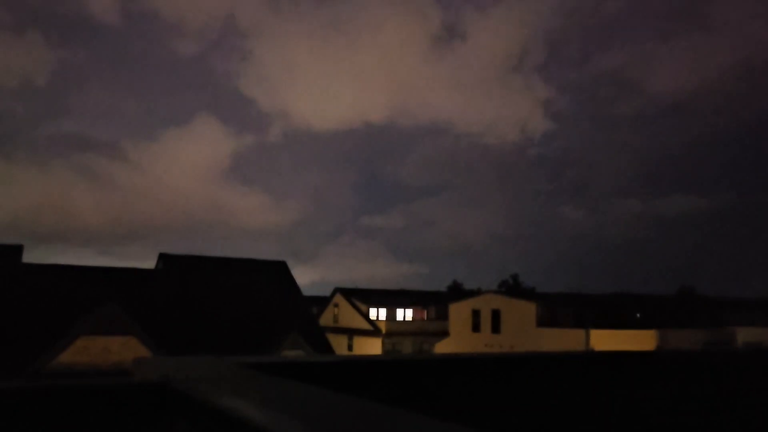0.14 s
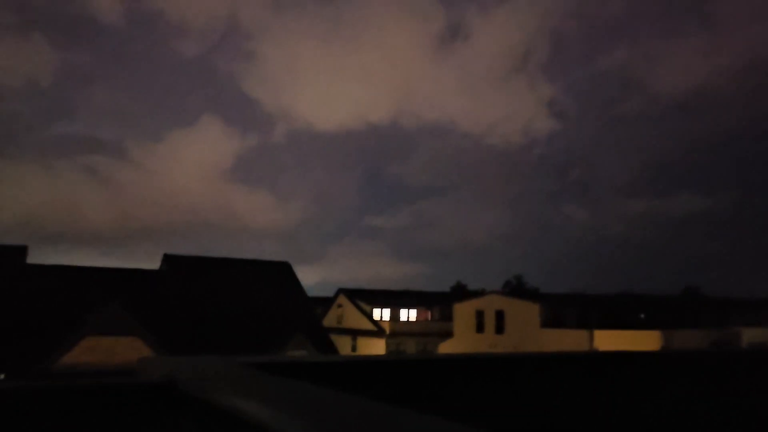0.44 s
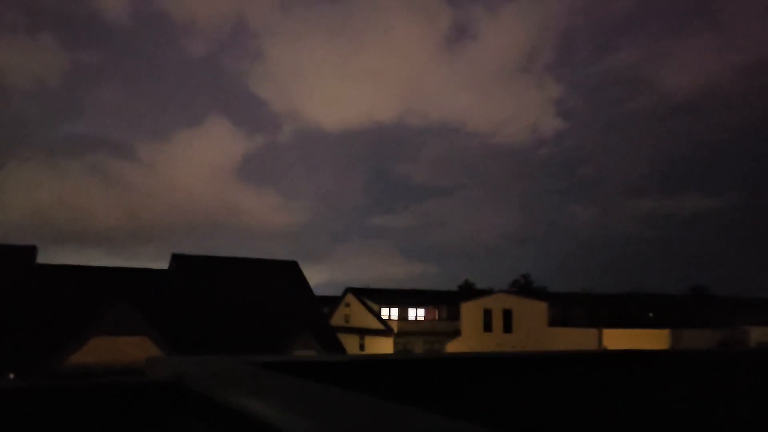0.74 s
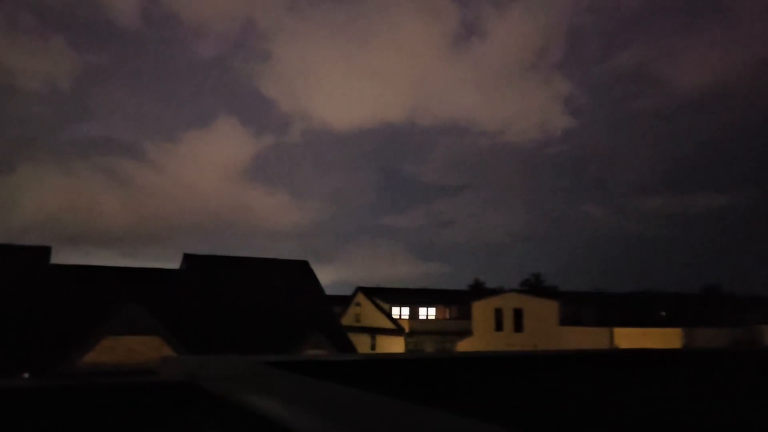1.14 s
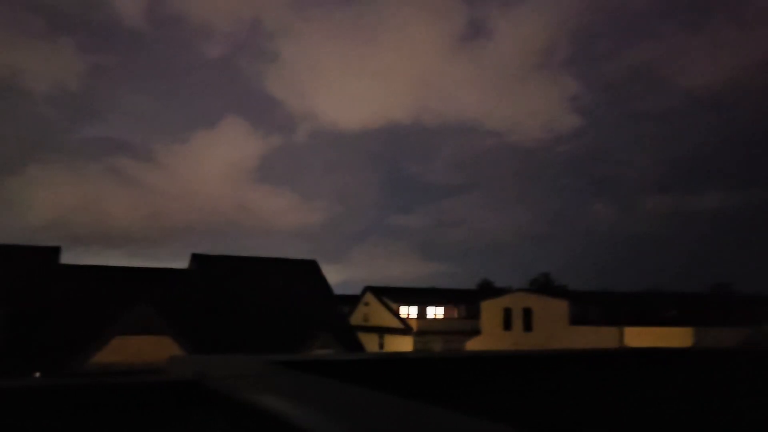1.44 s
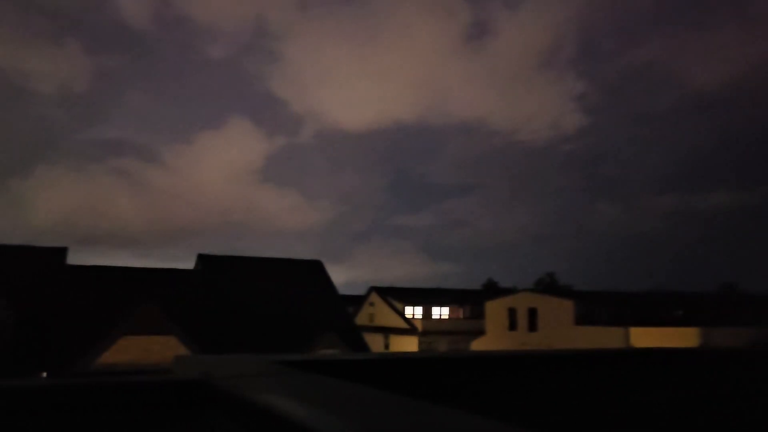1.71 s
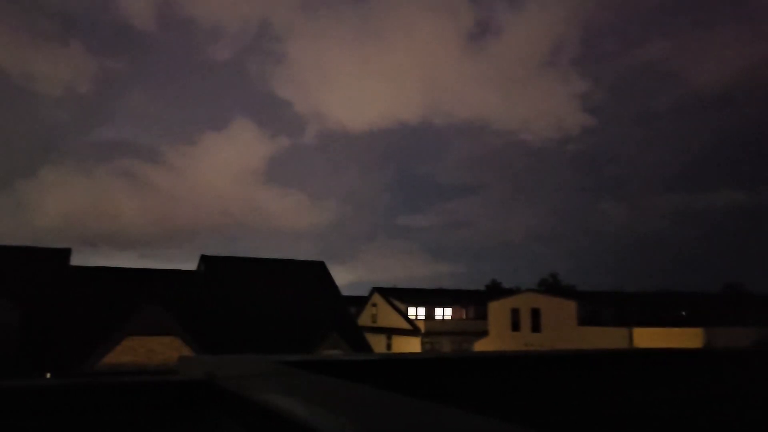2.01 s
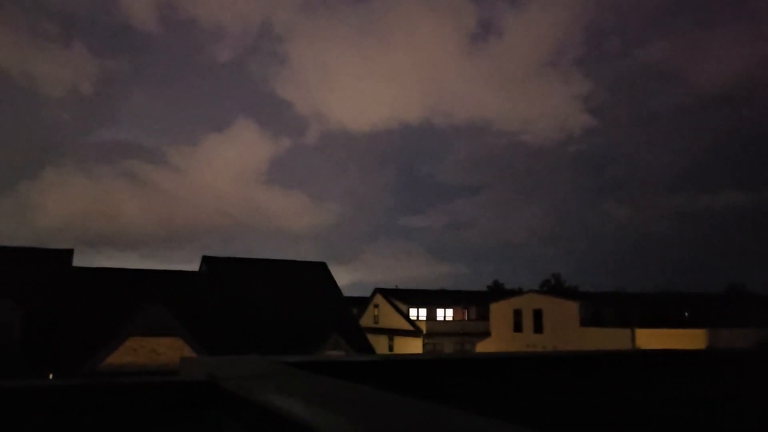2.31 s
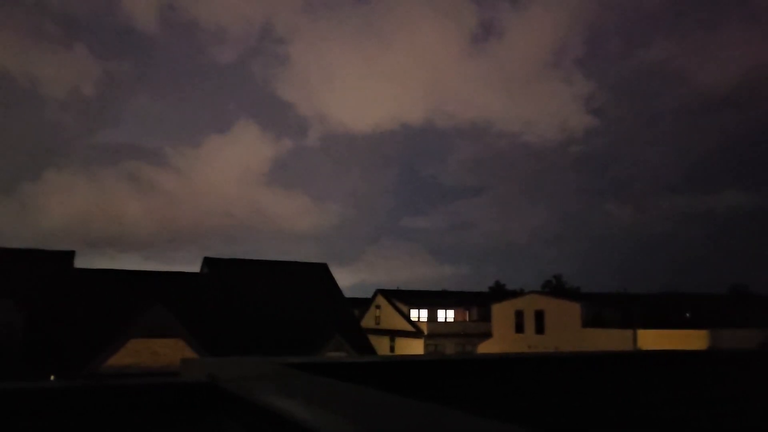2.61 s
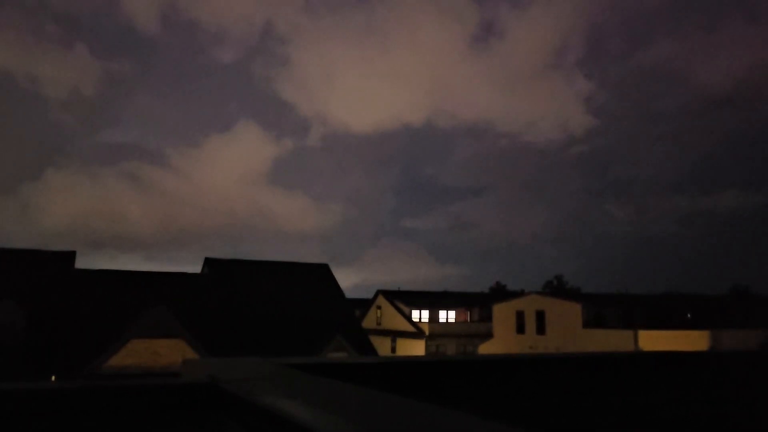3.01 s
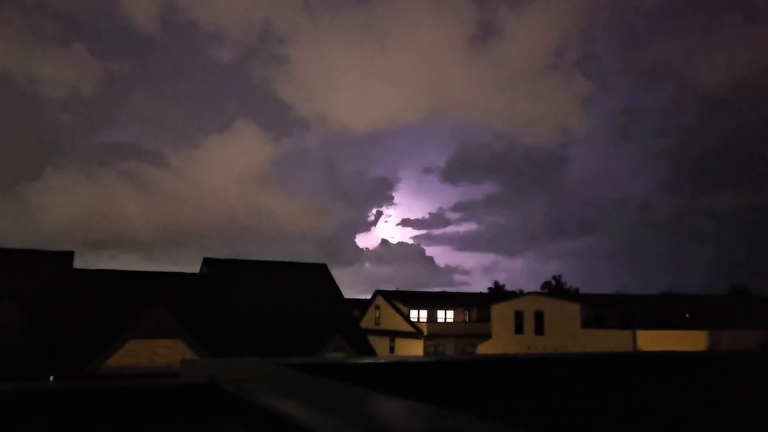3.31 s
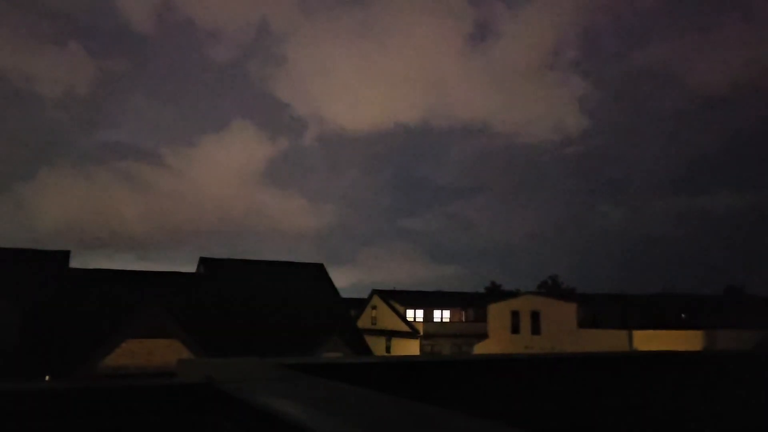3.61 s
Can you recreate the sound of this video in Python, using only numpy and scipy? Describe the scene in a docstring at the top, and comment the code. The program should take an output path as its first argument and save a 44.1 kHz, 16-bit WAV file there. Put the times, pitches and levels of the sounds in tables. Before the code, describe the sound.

Raspy pulsing insect calls outdoors at night, with a steady low rumble far away.

```python
"""Rooftops of a town at night. A katydid rasps phrases of four or five wing strokes: a scraper runs
over a file of teeth and rings the wing. A farther one answers faintly; a higher insect starts late.
Under them lie the town's murmur, machine hum and a far engine's drone. Halfway through, a rumble
like distant thunder rolls in. There is one faint far scuff and one tiny tick close by."""
import sys
import numpy as np
from scipy import signal
from scipy.fft import rfft, irfft
from scipy.io import wavfile
from scipy.ndimage import uniform_filter1d

SR = 44100
rng = np.random.default_rng(int(sys.argv[2]) if len(sys.argv) > 2 else 0)


def generate_wav(signal):
    """Clip the signal to [-1, 1] and save it as 16-bit WAV at the path in sys.argv[1]."""
    frames = np.transpose(np.atleast_2d(signal))
    scaled = np.clip(frames, -1, 1) * 32767
    pcm = np.round(scaled).astype(np.int16)
    wavfile.write(sys.argv[1], SR, pcm)


N = 165375
T = np.arange(N) / SR
HZ = np.maximum(np.arange(N // 2 + 1) * SR / N, 1)


def katydids():
    """Near katydid on the right; a far one with the same wing and more echo."""
    # wing strokes, near and far: peak t/s, level/dB, tilt/(dB/kHz)
    near_strokes = [(.005, 4.5, 0), (.095, 3.5, 1.9), (.191, 3.5, -0.5), (.284, 3.5, 0.5), (1.426, 4, 0.8),
                    (1.520, 2.5, -0.9), (1.607, 3, 0.5), (1.699, 3, -0.5), (1.793, 3, 0), (3.087, -0.5, 0),
                    (3.174, 0, 0.5), (3.266, 2, 0.5), (3.355, 1.5, 0.4), (3.449, 2, 1)]
    far_strokes = [(.345, -13, -3), (.400, -11.5, -3), (.436, -11.5, 0), (.472, -12.5, -3.5)]
    # wing resonances: f/Hz, width/Hz, level/dB, lead/s
    wing = [(2335, 270, 2.5, 0.0043), (2590, 180, -3, .015), (2945, 89, 2.5, 0.0085),
            (3187, 146, 4, 0.0088), (3420, 92, -2, -0.013), (3715, 47, 1.5, 0.0072), (4020, 77, 1, -.002),
            (4260, 60, -2.5, -.006), (4730, 400, 0.5, -0.0065), (4974, 120, 4, 0.0076),
            (5210, 220, -8, -0.037), (5585, 200, 1, 0.0039), (6114, 160, -1, 0.011),
            (6460, 190, -8.5, .012), (7230, 120, -12.5, .012), (7700, 100, -19.5, -0.011),
            (8140, 66, -22, .008), (8340, 200, -25.5, .003)]
    near = from_side(stridulate(near_strokes, wing, echo_db=-2.5), pan_db=-2, lag_s=.00002)
    far = stridulate(far_strokes, wing, echo_db=2)
    return from_db(-41.5) * butterworth(near + far, order=10, hz=9000)


def high_insect():
    """Thinner, higher wing rasp from the right."""
    # wing strokes: peak t/s, level/dB, tilt/(dB/kHz)
    strokes = [(3.594, -13, .7), (3.659, -4, .3), (3.700, -2, -1.6), (3.738, 2, 0)]
    # wing resonances: f/Hz, width/Hz, level/dB, lead/s
    wing = [(7500, 250, -6, 0), (8160, 260, 1.5, .003), (8700, 520, 2.5, 0), (10150, 480, 2.5, 0),
            (11300, 500, -10, 0), (13800, 2200, -18, 0)]
    rasp = butterworth(stridulate(strokes, wing, echo_db=-2), order=3, hz=(5500, 14000), kind="band")
    return from_db(-48.5) * from_side(rasp, pan_db=-1.5, lag_s=.00016)


def stridulate(strokes, wing, echo_db):
    """Tooth clicks ring the wing's resonances, a little differently on every stroke."""
    pivot_hz, colour_spread_db = 4570, .8
    pressure = wing_pressure(strokes)
    teeth = file_teeth()
    tilt_db_per_khz = in_time([(s, tilt) for s, _, tilt in strokes])
    echo = from_db(echo_db) * roof_echo(pressure * teeth)
    rasp = 0
    for hz, width_hz, db, lead_s in wing:
        force = teeth * np.interp(T + lead_s, T, pressure)
        tilt_db = tilt_db_per_khz * (hz - pivot_hz) / 1000
        colour_db = in_time([(s, rng.normal(0, colour_spread_db)) for s, _, _ in strokes])
        rasp = rasp + from_db(tilt_db + colour_db) * resonate(force + echo, [(hz, width_hz, db)])
    return rasp


def wing_pressure(strokes):
    """The wings close with growing pressure, hold it, then let go."""
    swell_s, swell_db, hold_s, release_s, release_db = .033, 12, .016, .011, 14
    pressure = np.zeros(N)
    for peak_s, db, _ in strokes:
        span = abs(T - peak_s) < .1
        early = np.maximum(peak_s - hold_s / 2 - T[span], 0) / swell_s
        late = np.maximum(T[span] - peak_s - hold_s / 2, 0) / release_s
        fade_in = np.clip(4 * (1.25 - early), 0, 1)
        pressure[span] += from_db(db - swell_db * early - release_db * late) * fade_in
    return pressure


def file_teeth():
    """Scraper on the file: one uneven click per tooth, over scraping noise."""
    teeth_per_s, jitter, spread_db, scrape_db = 620, .3, 1.2, -18.5
    gap_draw, level_draw = rng.standard_normal((6000, 2)).T
    at = (np.cumsum(np.exp(jitter * gap_draw)) * SR / teeth_per_s).astype(int)
    teeth = from_db(scrape_db) * rng.standard_normal(N)
    teeth[at[at < N]] += from_db(spread_db * level_draw[at < N])
    return teeth


def tick():
    """One light contact close by, on the left."""
    # body resonances: f/Hz, width/Hz, level/dB
    body = [(4000, 700, 2), (5450, 700, 2.5), (7550, 550, -2), (8350, 700, -8)]
    at_s, force_db, echo_db = 2.2918, -32.5, -11
    click = np.zeros(N)
    click[int(at_s * SR)] = from_db(force_db)
    ring = resonate(click + from_db(echo_db) * roof_echo(click), body)
    return from_side(butterworth(ring, order=8, hz=9200), pan_db=1.2, lag_s=-.00023)


def scuff():
    """Faint far scuff: a brief swell of midrange noise."""
    at_s, sigma_s = .757, .034
    return from_db(-68) * bell_curve(T - at_s, sigma_s) * stereo_noise(peak(hz=1570, width_hz=600))


def rumble():
    """Dull far roll with soft thuds and longer booms in it."""
    # roll envelope: t/s, level/dB
    envelope = [(0, -82), (1.76, -68.5), (1.86, -57.5), (2.0, -45), (2.13, -43.5), (2.27, -47), (2.45, -45),
                (2.6, -46.5), (2.85, -49.5), (3.1, -45), (3.33, -48.5), (3.6, -45.5), (3.68, -52.5),
                (3.75, -54)]
    # roll spectrum: f/Hz, relative density/dB
    spectrum = [(8.8, -42.5), (15, -13), (27, -3.5), (37, 2.5), (49, 2.5), (70, -5.5), (102, 2.5),
                (152, -3.5), (177, -1.5), (217, -13.5), (242, -12.5), (300, -15), (390, -53.5), (660, -120)]
    # thuds and booms: t/s, peak level/dB, f/Hz, sigma/cycles
    thuds = [(1.878, -41, 85, .8), (1.987, -40, 52, .8), (2.097, -34, 42, .8), (2.110, -36, 165, 1.5),
             (2.270, -42, 102, 4.5), (2.424, -38, 40, 1), (3.078, -38, 75, .8), (3.500, -41.5, 102, 7)]
    noise = stereo_noise(from_db(over_hz(spectrum)) * below(hz=235))
    roll = from_db(in_time(envelope)) * steadied(noise, samples=4000)
    for at_s, db, hz, sigma_cycles in thuds:
        cycles = (T - at_s) * hz
        roll += from_db(db) * bell_curve(cycles, sigma_cycles) * np.cos(2 * np.pi * (cycles + rng.random()))
    return roll


def town():
    """Low murmur of the town, crossing over to the hiss of the night air."""
    # spectra: f/Hz, relative density/dB
    murmur_spectrum = [(8.8, -41), (15, -6.5), (32, -5), (52, 1.5), (65, -8.5), (91, -6.5), (183, -12),
                       (245, -13.5), (269, -10.5), (290, -20), (402, -22.5), (441, -28), (469, -22.5),
                       (600, -31), (780, -60), (1320, -120)]
    air_spectrum = [(290, -33.5), (500, -1), (685, -6.5), (803, -3), (875, -6), (1020, -8), (1120, -8.5),
                    (1220, -6), (1310, -7), (1790, -9.5), (2160, -5.5), (2390, -12.5), (3230, -14),
                    (3470, -19.5), (3890, -14.5), (4490, -23), (4890, -19.5), (5180, -26.5), (5810, -31.5),
                    (6560, -29), (7000, -34.5), (8310, -36.5), (9460, -51.5), (11400, -37), (15400, -35)]
    # murmur envelope: t/s, relative level/dB
    envelope = [(0, -1.5), (.5, -1), (1.0, 0.5), (1.8, -1), (3.0, -0.5), (3.75, -3)]
    low = below(hz=546)
    high = np.sqrt(1 - low ** 2)
    murmur = steadied(stereo_noise(from_db(over_hz(murmur_spectrum)) * low), samples=6000)
    air = stereo_noise(from_db(over_hz(air_spectrum)) * high)
    return from_db(-52 + in_time(envelope)) * murmur + from_db(-66) * air


def machine_hum():
    """Far machinery: wavering tones of narrow-band noise."""
    # tones: f/Hz, half-width/Hz, level/dB
    tones = [(102, 1.9, -64.5), (176.7, 4, -66), (237.5, 5, -68), (296.9, 3.6, -69), (462, 6.6, -91),
             (825, 23, -84), (1079, 11, -84.5), (1257, 0.79, -84.5), (1993, 5.9, -89.5), (2070, 12, -87),
             (2098, 9.6, -82.5), (3236, 8.9, -88.5), (4890, 16, -88.5), (6600, 43, -98)]
    power = sum((from_db(db) * rms_one(peak(hz, width_hz))) ** 2 for hz, width_hz, db in tones)
    return np.sqrt(power.mean()) * stereo_noise(np.sqrt(power))


def engine_drone():
    """Far engine: one deep tone, wavering in pitch."""
    # drone envelope: t/s, rms level/dB
    envelope = [(0, -50), (.2, -54.5), (.85, -48.5), (1.0, -73), (1.4, -59), (1.8, -58), (3.75, -50)]
    pitch_hz = 42.06 + 1.28 * stereo_noise(below(hz=3.48))[0]
    return np.sqrt(2) * from_db(in_time(envelope)) * np.sin(2 * np.pi * np.cumsum(pitch_hz) / SR)


def roof_echo(x):
    """Scatter off roofs and walls: a diffuse wash following the energy, different in each ear."""
    t60_s = .085
    decay = np.exp(-2 * np.log(1000) / (t60_s * SR))
    energy = signal.lfilter([1 - decay], [1, -decay], x ** 2 + 1e-24)
    return np.sqrt(energy) * rng.standard_normal((2, N))


def resonate(force, modes):
    """Parallel steep-sided resonances, two biquads each."""
    ring = 0
    for hz, width_hz, db in modes:
        radius = np.exp(-np.pi * width_hz / SR)
        gain = (1 - radius ** 2) / 2
        section = [gain, 0, -gain, 1, -2 * radius * np.cos(2 * np.pi * hz / SR), radius ** 2]
        ring = ring + from_db(db) * signal.sosfilt([section, section], force + 1e-18)
    return ring


def stereo_noise(gain):
    """Shaped unit-rms noise, alike in both ears in the bass, diffuse above."""
    # left-right likeness: f/Hz, correlation
    likeness = [(60, 0.96), (120, 1), (240, 0.9), (480, 0.51), (950, -0.2), (1890, 0.16), (3770, -0.092),
                (7520, -0.055), (15000, 0.01)]
    alike = np.clip(over_hz(likeness), -.95, .995)
    mid, side = rfft(rng.standard_normal((2, N)))
    spectrum = np.sqrt(1 + alike) * mid + np.sqrt(1 - alike) * side * [[1], [-1]]
    return rms_one(irfft(gain * spectrum, N))


def from_side(x, pan_db, lag_s):
    """Louder and earlier in the nearer ear; positive lag delays the left."""
    left, right = pan(pan_db) * x
    return np.array([np.interp(T - lag_s, T, left), right])


def pan(db):
    """Gains: left +db, right -db."""
    return from_db([[db], [-db]])


def steadied(x, samples):
    """Even out chance swells longer than the window."""
    return x / np.sqrt(uniform_filter1d(np.mean(x ** 2, axis=0), samples) + 1e-12)


def butterworth(x, order, hz, kind="low"):
    """Causal Butterworth filter."""
    return signal.sosfilt(signal.butter(order, hz, kind, fs=SR, output="sos"), x)


def below(hz):
    """Gain of an 8th-order low-pass."""
    return 1 / np.sqrt(1 + (HZ / hz) ** 16)


def peak(hz, width_hz):
    """Spectral peak, half gain at hz +/- width_hz."""
    return 1 / (1 + ((HZ - hz) / width_hz) ** 2)


def bell_curve(x, sigma):
    """Gaussian, peak 1."""
    return np.exp(-.5 * (x / sigma) ** 2)


def in_time(rows):
    """Interpolate (t/s, value) rows."""
    return np.interp(T, *np.transpose(rows))


def over_hz(rows):
    """Interpolate (f/Hz, value) rows in log frequency."""
    hz, value = np.transpose(rows)
    return np.interp(np.log(HZ), np.log(hz), value)


def from_db(db):
    """Decibels to gain."""
    return 10 ** (np.asarray(db) / 20)


def rms_one(x):
    """Scale to unit rms."""
    return x / np.sqrt(np.mean(x ** 2) + 1e-30)


def scene():
    """Insects, tick and scuff over the distant background."""
    events = katydids() + high_insect() + tick() + scuff()
    background = town() + machine_hum() + engine_drone() + rumble()
    return events + pan(db=.38) * background


def record(dry):
    """Low cut and steep top cut; a mirrored lead-in settles the filters."""
    top_hz = 15450
    padded = np.pad(dry, ((0, 0), (SR // 4, 0)), mode="reflect")
    low_cut = butterworth(padded, order=2, hz=19, kind="high")
    return signal.sosfilt(signal.ellip(12, .1, 70, top_hz, fs=SR, output="sos"), low_cut)[:, -N:]


dry = scene()
out = record(dry)
generate_wav(out)
```